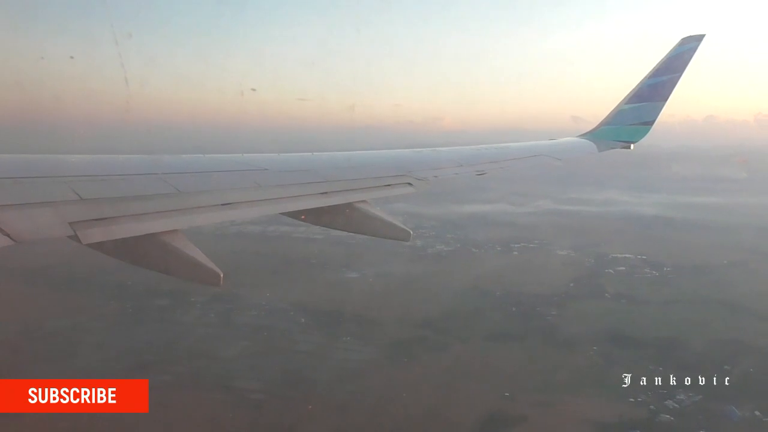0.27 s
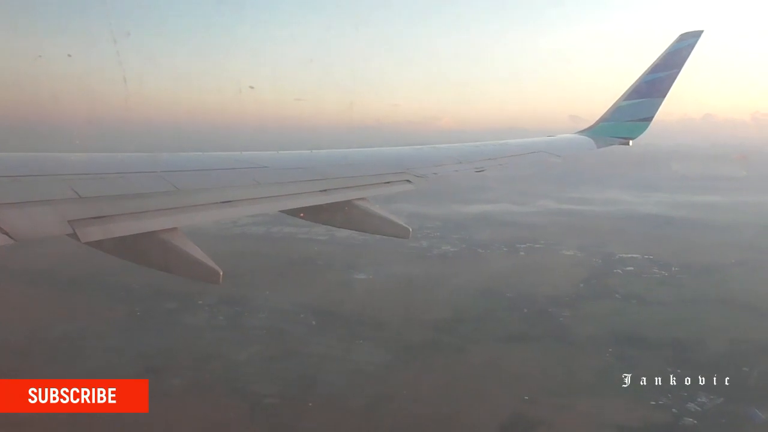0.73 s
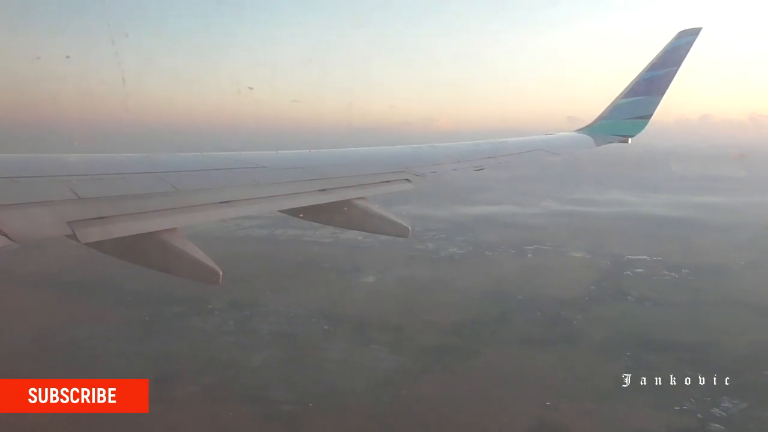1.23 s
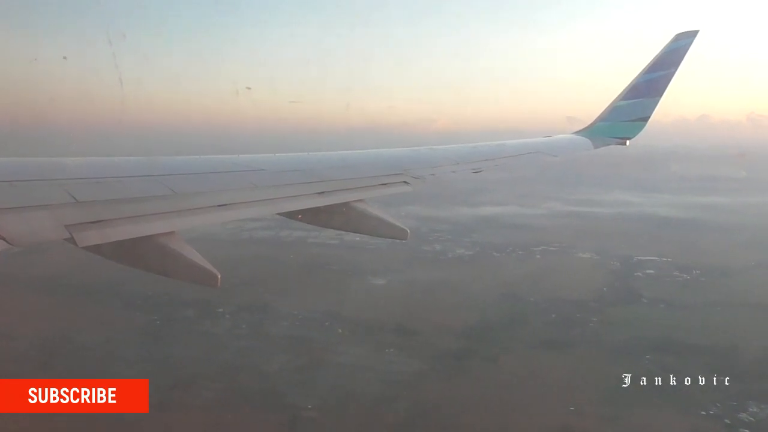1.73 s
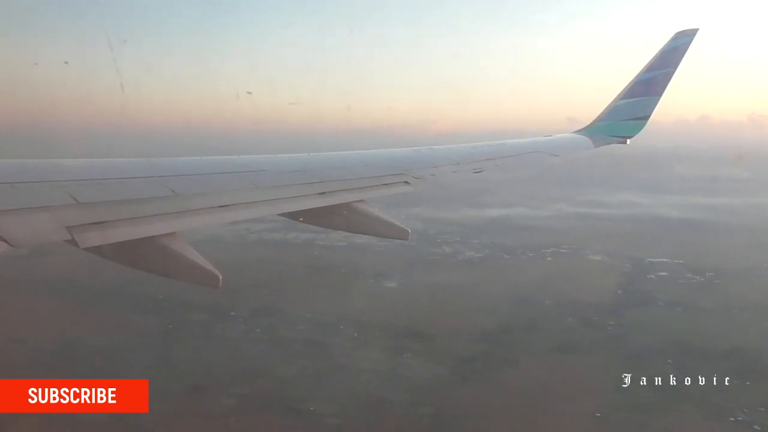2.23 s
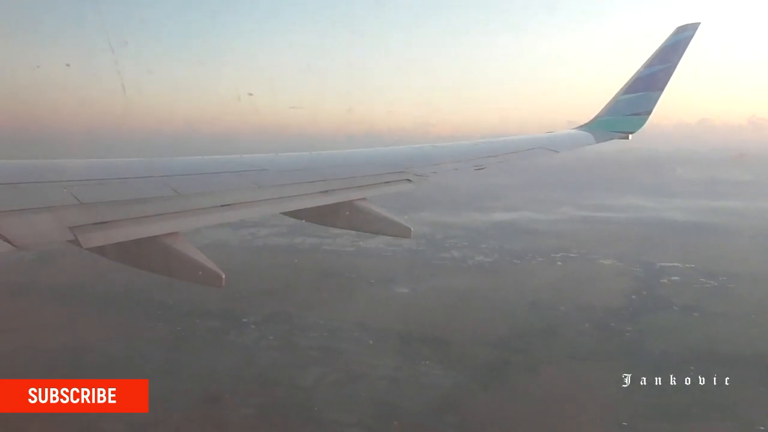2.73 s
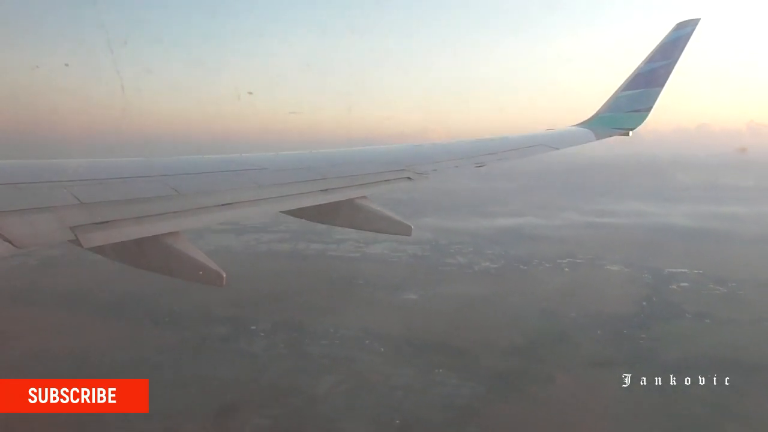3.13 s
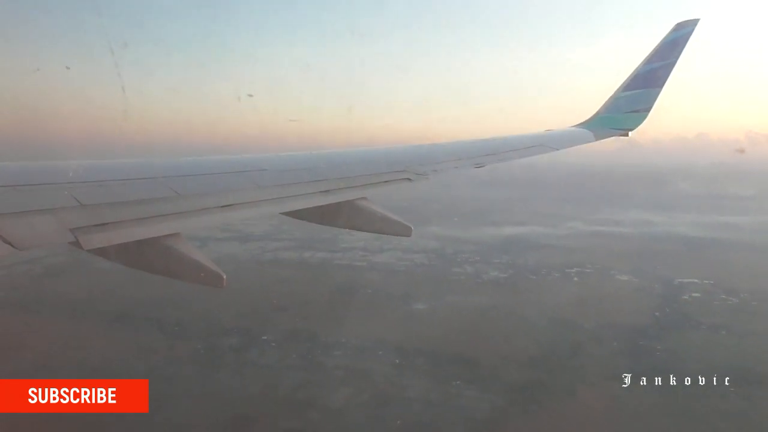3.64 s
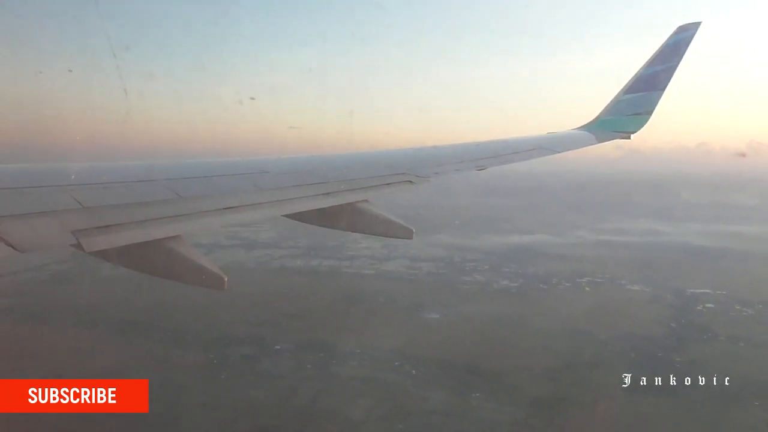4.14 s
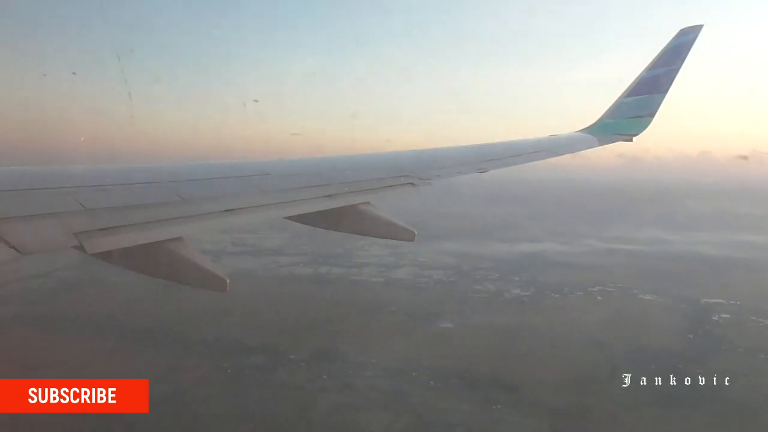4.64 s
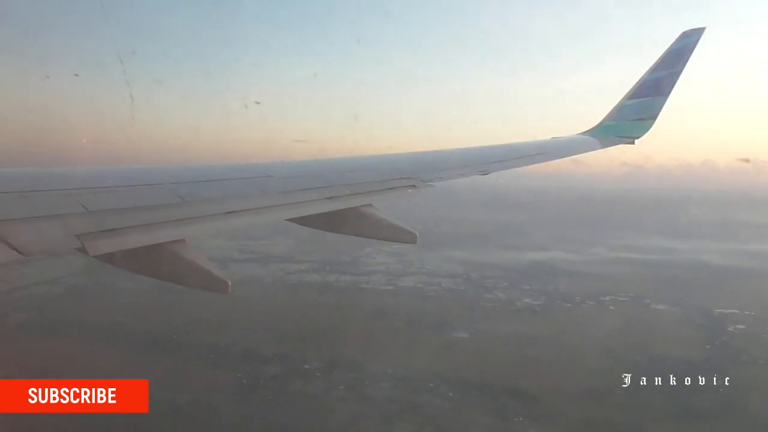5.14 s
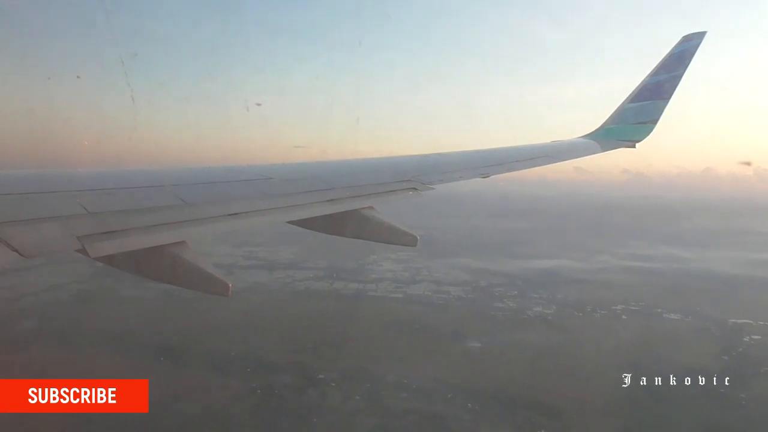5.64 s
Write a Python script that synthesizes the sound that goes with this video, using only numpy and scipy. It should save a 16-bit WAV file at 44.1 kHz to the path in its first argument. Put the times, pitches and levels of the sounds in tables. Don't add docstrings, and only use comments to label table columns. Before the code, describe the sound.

A window seat inside a jet airliner during climb, captured close by a small stereo microphone. A loud, deep roar begins at once and holds for about 6 seconds, concentrated in a booming low band around 150 to 400 Hz, with deepest bass thinned out. Far beneath it, airflow along the hull makes a muffled panel rumble, a fainter window rush and an almost buried vent hiss. The roar is broad and noisy, wavering with brief irregular swells and dips, with a noticeable dip near 1.8 s and stronger swells around 3.6 and 4.2 to 4.4 s. From about 1 s, the tallest low surges overload the microphone, leaving small dry ticks near 1.4, 2.0, 2.35 and 4.2 to 4.4 s. Tiny vent spits occur near 1.4 and 1.9 s. The stereo image is mostly central with slight width. The roar continues without resolution to the end.

```python
import sys
import numpy as np
from scipy import signal
from scipy.io import wavfile
from scipy.ndimage import uniform_filter1d, minimum_filter1d

SR = 44100
rng = np.random.default_rng(int(sys.argv[2]) if len(sys.argv) > 2 else 0)


def inscribe(sig):
    pcm = np.round(np.clip(np.atleast_2d(sig).T, -1, 1) * 32767)
    wavfile.write(sys.argv[1], SR, pcm.astype(np.int16))


def level_to_linear(level):
    exponent = np.asarray(level, float) / 20
    return 10 ** exponent


N = 258867
FRAME, HOP = 4096, 1024

# freq_hz, level_db
BOOM_MID = [(22, -52), (38, -21), (183, -1.5), (231, -4.5), (331, -5.5), (380, -17.5), (480, -25),
            (620, -60.5), (1060, -120)]
BOOM_SIDE = [(22, -54), (38, -23.5), (102, -13), (177, 2), (243, 0.5), (285, -7.5), (345, -1.5), (480, -19),
             (620, -51.5), (1060, -120)]
PANEL_MID = [(280, -31.5), (480, -4), (529, -4), (682, -9), (811, -4.5), (847, -8.5), (914, -18),
             (1290, -19.5), (1530, -26), (1750, -39), (2280, -68), (3850, -120)]
PANEL_SIDE = [(280, -26.5), (480, 0), (626, -5.5), (701, -8.5), (820, -1), (960, -15), (1300, -16),
              (1750, -29), (2280, -55.5), (3850, -120)]
WINDOW_MID = [(1030, -34.5), (1750, -11), (1920, 0), (2080, 0.5), (2390, -3.5), (2960, -15.5), (3310, -9),
              (3600, -12), (3830, -9), (5800, -22), (7540, -53), (12800, -120)]
WINDOW_SIDE = [(1030, -32.5), (1750, -1), (2050, -1), (2670, -4.5), (2990, -13), (3230, -10.5), (3620, -13),
               (3960, -8.5), (4630, -12), (5300, -17), (5800, -22.5), (7540, -51.5), (12800, -120)]
VENT_MID = [(3410, -30.5), (5800, -5), (7160, 1.5), (7870, 0), (10600, 0), (12500, -2.5), (15600, -17)]
VENT_SIDE = [(3410, -38.5), (5800, -7.5), (7220, -3), (8410, -2), (10100, 2), (11200, -4), (15600, -21)]
# freq_hz, lean (-1..1)
LEFT_LEAN = [(60, 0), (180, -0.31), (340, .65), (450, .1), (800, -.6), (1000, -.2), (2000, -.5),
             (3300, -.05), (15000, 0)]
# freq_hz, width_hz, level_db
RESONANCES = [(109.3, 12, 4), (124, 21, 2.5), (186, 10, 8.5), (216.6, 7.3, 1.5), (256, 16, 3),
              (337, 59, 1.5), (439, 46, 2.5), (506, 28, -2), (766, 12, 3), (847, 23, 1), (1073, 37, 4),
              (2030, 62, 1), (3400, 140, 2), (3750, 170, 3), (4450, 150, 2), (7230, 300, 0),
              (10900, 300, 2)]
# start_s (bell centre), level_db
SWELLS = [(.127, 3), (.529, 3), (.92, 4), (1.03, 2.5), (1.397, 0.5), (1.763, 3.5), (1.97, 1.5),
          (2.369, 1.5), (3.333, 3.5), (3.622, 4.5), (3.732, 4), (4.167, 3), (4.383, 4), (4.842, 2.5),
          (5.154, 2.5), (5.301, 2), (5.615, 3)]
# start_s (bell centre), level_db
LULLS = [(.181, -4.5), (.41, -4.5), (.704, -2.5), (1.164, -2), (1.317, -3.5), (1.82, -6), (2.86, -3.5),
         (3.104, -3), (3.397, -4.5), (3.69, -3.5), (3.777, -3), (4.206, -3), (4.324, -3), (5.203, -4)]
# start_s, level_db
HULL_FLOW = [(0, -.2), (.45, 1.3), (1.101, -0.1), (1.4, 0.16), (1.7, -0.26), (2.4, -.1), (2.9, -0.84),
             (3.5, 0.4), (4.2, 0.1), (5.1, 0.05), (5.5, .5), (5.87, 0.1)]
# start_s (bell centre), level_db (above the hiss)
VENT_SPITS = [
    (1.3925, 9),
    (1.930, 7),
]
# start_s (centre), left_crest, right_crest (full scale = 1, sign = push
# or pull), pitch_hz; the last row lifts the low swing at the very end, where the sound stops abruptly on it
SURGES = [(.9200, .94, 1.07, 195), (1.3993, 1.07, 1.19, 170), (1.5704, -.91, -.92, 230),
          (1.9699, -1.07, -1.13, 240), (2.2294, -.78, -.95, 215), (2.3492, .95, 1.11, 200),
          (2.6973, .93, .89, 225), (3.6239, .9, 1.0, 215), (4.1675, -1.13, -1.34, 205),
          (4.3828, -1.11, -.93, 245), (5.3032, -.82, -.95, 200), (5.8694, .27, .3, 150)]

ROAR_DB, PANEL_DB, WINDOW_DB, VENT_DB = -11, -35.5, -58, -67.5
SWELL_S, LULL_S, SPIT_S = 0.029, 0.024, 0.0012
FLUTTER_DB = 0.5


def evened(x):
    return x / np.sqrt(np.mean(x ** 2) + 1e-20)


def smoothed_twice(x, samples):
    return uniform_filter1d(uniform_filter1d(x, size=samples), size=samples)


def bells(events, width_s):
    t_s = np.arange(N) / SR
    return sum(level_db * np.exp(-((t_s - start_s) / width_s) ** 2) for start_s, level_db in events)


def read(points, hz):
    f, value = np.transpose(points)
    return np.interp(np.log(hz + 1), np.log(f + 1), value)


def pair(mid, side, side_db, patchy_db):
    frames, hz = N // HOP + 6, np.fft.rfftfreq(FRAME, 1 / SR)
    a, b, c, d, patches = rng.standard_normal((frames, len(hz), 5)).T
    patches = uniform_filter1d(patches, size=40, axis=0)
    patches = evened(uniform_filter1d(patches, size=4, axis=1))
    rings_db = sum(db / (1 + (2 * (hz - f) / width) ** 2) for f, width, db in RESONANCES)
    lean = np.clip(read(LEFT_LEAN, hz), -1, 1)[:, None]
    shared = a + 1j * b
    apart = lean * shared + np.sqrt(1 - lean ** 2) * (c + 1j * d)
    mid_gain = level_to_linear(read(mid, hz) + rings_db)[:, None]
    side_gain = level_to_linear(read(side, hz))[:, None]
    z = np.array([shared * mid_gain, apart * side_gain]) * level_to_linear(patchy_db * patches)
    noise = signal.istft(z, nperseg=FRAME, noverlap=FRAME - HOP)[1]
    m, s = noise[:, FRAME:FRAME + N]
    m, s = evened(m), evened(s) * level_to_linear(side_db)
    return np.array([m + s, m - s])


def boom(thrust_db):
    x = pair(BOOM_MID, BOOM_SIDE, side_db=-17.0, patchy_db=0.08)
    power = smoothed_twice(x.mean(0) ** 2, 3000)
    x = x / np.sqrt(power) * level_to_linear(uniform_filter1d(thrust_db, size=1500))
    crest = -minimum_filter1d(-abs(x).max(0), size=1000)
    x = x / smoothed_twice(np.maximum(crest / .92, 1), 500)
    rise = np.minimum(np.arange(N) / 250, 1)
    return x * np.sin(np.pi / 2 * rise) ** 2


def airflow(flow_db):
    drift_db = uniform_filter1d(flow_db - flow_db.mean(), size=6000)
    panel = level_to_linear(PANEL_DB + 1.6 * drift_db) * pair(PANEL_MID, PANEL_SIDE, side_db=-10, patchy_db=0.44)
    window = level_to_linear(WINDOW_DB + 1.4 * drift_db) * pair(WINDOW_MID, WINDOW_SIDE, side_db=-4.5, patchy_db=0.6)
    return panel + window + vent(drift_db)


def vent(drift_db):
    hiss = level_to_linear(VENT_DB + .9 * drift_db) * pair(VENT_MID, VENT_SIDE, side_db=0.1, patchy_db=0.5)
    return hiss * level_to_linear(FLUTTER_DB * flutter() + bells(VENT_SPITS, SPIT_S))


def flutter():
    t_s = np.arange(N) / SR
    rates_hz = np.geomspace(2.5, 20, 20)
    return evened(sum(np.sin(2 * np.pi * (f * t_s + rng.random())) / np.sqrt(f) for f in rates_hz))


def surges(x):
    half = 800
    t_s = np.arange(-half, half) / SR
    calm, crests = np.ones(N + half), np.zeros((2, N + half))
    lag_s = np.array([[0], [.00025]])
    for start_s, left, right, pitch_hz in SURGES:
        centre = round(start_s * SR)
        at = slice(centre - half, centre + half)
        calm[at] *= 1 - np.exp(-(t_s / .005) ** 2)
        swing = np.exp(-(t_s / .0034) ** 2) * np.cos(2 * np.pi * pitch_hz * (t_s + lag_s))
        crests[:, at] += np.array([[left], [right]]) * swing
    return x * calm[:N] + crests[:, :N]


def scene():
    thrust_db = ROAR_DB + bells(SWELLS, SWELL_S) + bells(LULLS, LULL_S)
    flow_db = np.interp(np.arange(N) / SR, *np.transpose(HULL_FLOW))
    low_cut = signal.butter(3, 40, "high", fs=SR, output="sos")
    roar = signal.sosfiltfilt(low_cut, boom(thrust_db))
    return surges(roar) + airflow(flow_db)


def top_cut(x):
    return signal.sosfilt(signal.butter(12, 15710, fs=SR, output="sos"), x)


def record(dry):
    full = np.clip(dry, -.997, .997)
    return top_cut(full)


dry = scene()
out = record(dry)
inscribe(out)
```